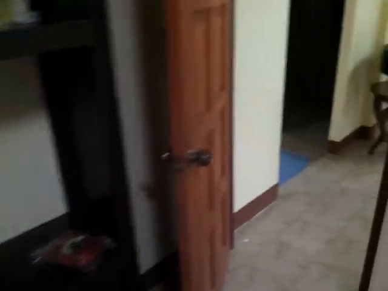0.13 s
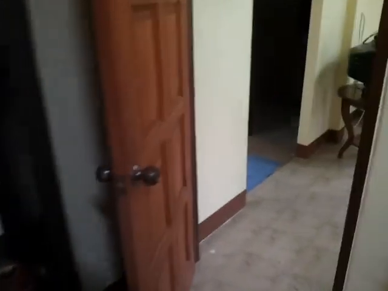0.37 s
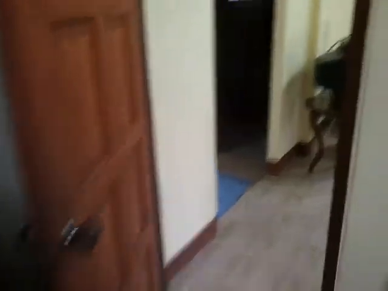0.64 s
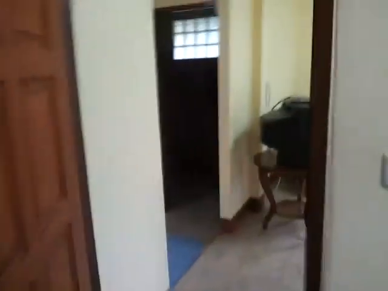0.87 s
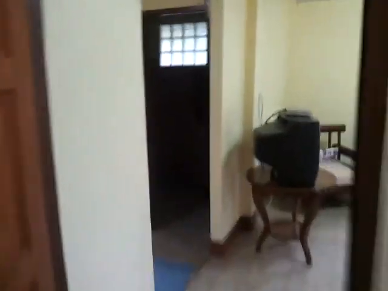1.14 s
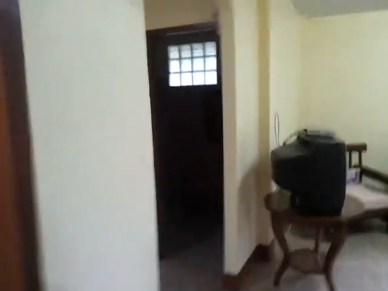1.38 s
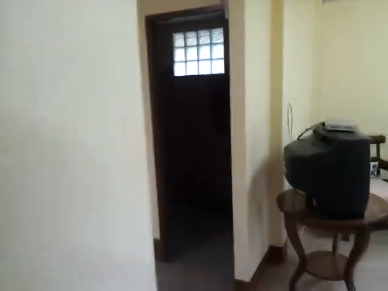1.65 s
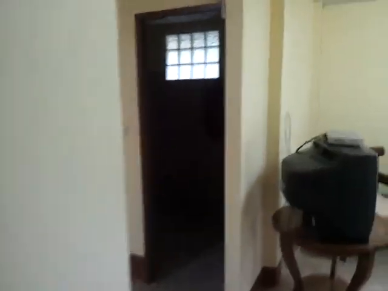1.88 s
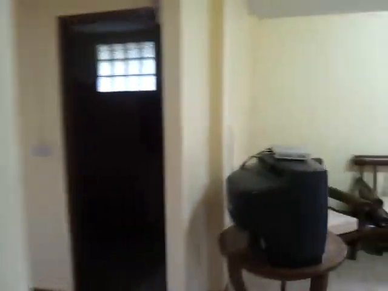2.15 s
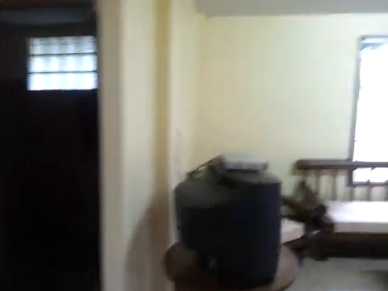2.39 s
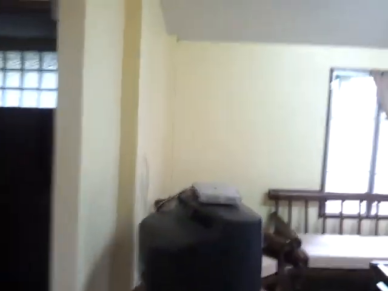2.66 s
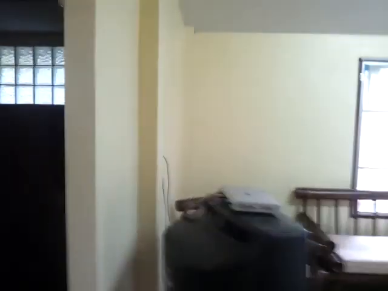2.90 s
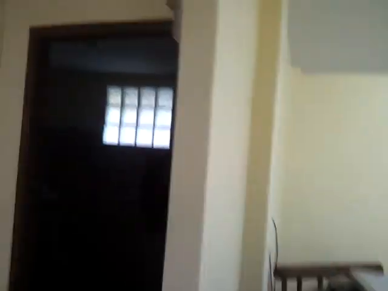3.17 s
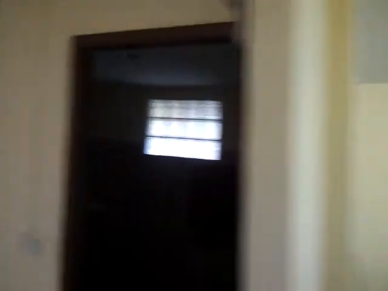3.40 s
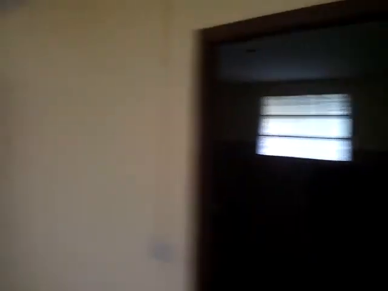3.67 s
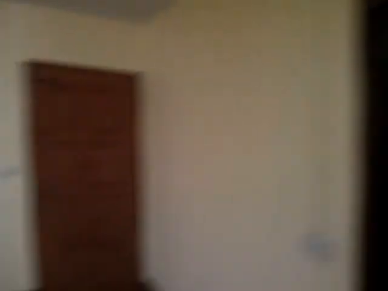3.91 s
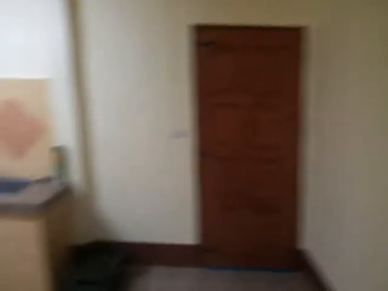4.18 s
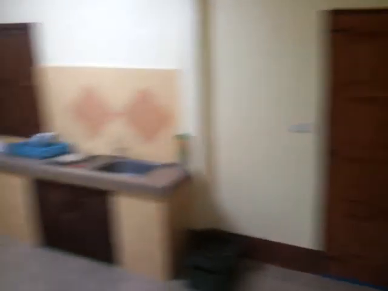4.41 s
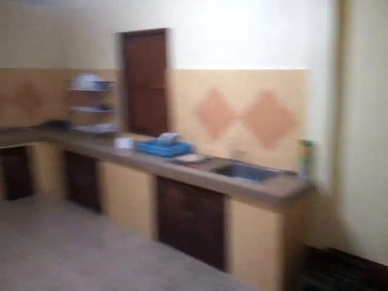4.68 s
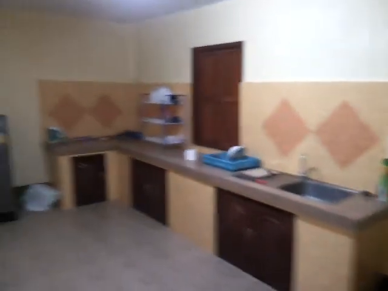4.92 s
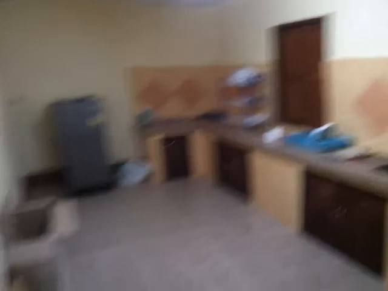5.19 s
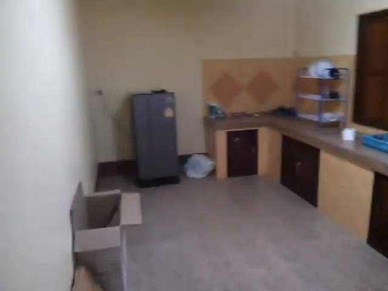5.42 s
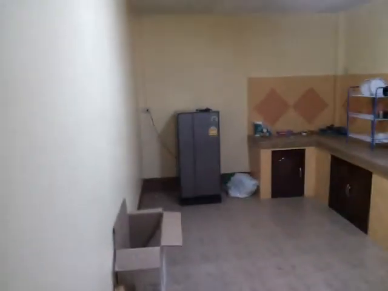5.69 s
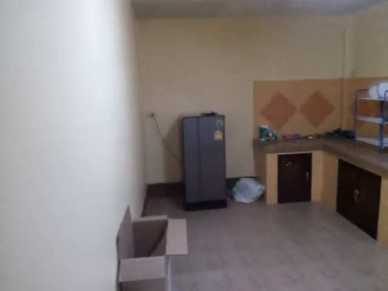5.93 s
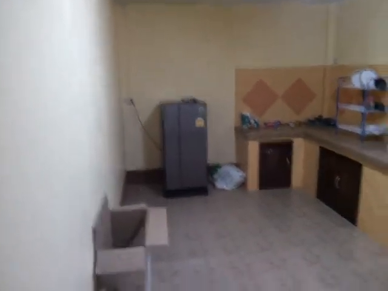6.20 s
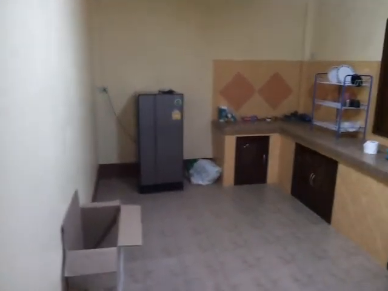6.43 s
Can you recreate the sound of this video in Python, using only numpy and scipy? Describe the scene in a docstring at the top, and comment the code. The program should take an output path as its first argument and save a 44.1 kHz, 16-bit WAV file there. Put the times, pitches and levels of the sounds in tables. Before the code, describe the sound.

Small latch clicks and rustling steps, a faint squeal, one booming door slam ringing through hard empty rooms, then a sharp metallic snap.

```python
"""Knob, hinges and slam in a tiled house

In a bare tiled house a hand works a metal door knob, hinges squeak, a wooden door slams and a far latch snaps later.
Clicks and blows are noise bursts through resonances; metal and wood ring as dying sines; rustle and hiss are noise.
Hard walls ring for about a second. A small hand-held recorder hisses, cuts off above 7 kHz and overloads on the slam."""
import sys
import numpy as np
from scipy import signal
from scipy.io import wavfile
from scipy.ndimage import uniform_filter1d

SR = 44100
rng = np.random.default_rng(int(sys.argv[2]) if len(sys.argv) > 2 else 0)


def master_out(mix):
    """Clip the mix to full scale and print it as 16-bit PCM to the path in sys.argv[1]."""
    frames = np.transpose(np.atleast_2d(mix))
    ceiling = np.clip(frames, -1, 1)
    pcm = np.round(ceiling * 32767).astype(np.int16)
    wavfile.write(sys.argv[1], SR, pcm)


def volts_from_decibels(level):
    """Turn decibel levels (scalar or array-like) into linear amplitude factors."""
    exponent = np.asarray(level, float) / 20
    return 10 ** exponent


N = 289804


def evened(x):
    """Scales x to an rms of 1."""
    return x / np.sqrt(np.mean(x ** 2) + 1e-20)


def read(points, hz):
    """Reads a spectrum curve, interpolated over log frequency."""
    f, value = np.transpose(points)
    return np.interp(np.log(hz + 1), np.log(f + 1), value)


def along(curve):
    """Draws a time curve out over the whole scene."""
    s, value = np.transpose(curve)
    return np.interp(np.arange(N) / SR, s, value)


def add(mix, s, sound):
    """Mixes a sound in at s seconds, cut at the end of the mix."""
    part = mix[round(s * SR):][:len(sound)]
    part += sound[:len(part)]


def colour(x, points):
    """Filters x by a spectrum without echoes ahead of time (minimum phase)."""
    log_gain = np.log(volts_from_decibels(read(points, abs(np.fft.fftfreq(8192, 1 / SR)))))
    taps = np.fft.ifft(np.exp(np.conj(signal.hilbert(log_gain)))).real[:4096]
    return signal.oaconvolve(x, taps)[:len(x)]


def resonate(x, hz, width):
    """A resonance of gain 1: x is shifted down to 0 Hz, smoothed and shifted back up."""
    turn = np.exp(2j * np.pi * hz * np.arange(len(x)) / SR)
    r = np.exp(-np.pi * width / SR)
    return 2 * (turn * signal.lfilter([1 - r], [1, -r], x / turn)).real


def ring(modes, seconds):
    """Dying sines, all set off at once."""
    t = np.arange(round(seconds * SR)) / SR
    return sum(volts_from_decibels(db - 60 * t / t60) * np.sin(2 * np.pi * hz * t) for hz, db, t60 in modes)


def puff(t60, spike):
    """A spike with a short dying burst of noise."""
    t = np.arange(6000) / SR
    burst = rng.standard_normal(6000) * volts_from_decibels(-60 * t / max(t60, .002))
    burst[0] = spike
    return burst


def snap(db, hz, width, t60):
    """A click through two stacked broad resonances, and a smooth impulse of equal energy for the room."""
    sources = puff(t60, spike=5.9), signal.unit_impulse(400)
    sound, impulse = (resonate(resonate(x, hz, width), hz, 1.12 * width) for x in sources)
    sound *= volts_from_decibels(db) / abs(sound).max()
    return sound, impulse * np.linalg.norm(sound) / np.linalg.norm(impulse)


def house(x, fill_s):
    """Sparse reflections of random sign that fill in, then die band by band."""
    # reverberation of the bare rooms: f/Hz, t60/s
    decay = [(60, 0.82), (200, 1.19), (500, 1.07), (1000, 1.076), (2000, 1.038), (3000, 0.99), (5000, 0.94),
             (8000, 0.8)]
    taps = np.zeros(2 * SR)
    at = np.arange(100, 2 * SR - 10, 10)
    taps[at + rng.integers(0, 10, len(at))] = rng.choice([-1., 1.], len(at))
    hz, t, z = signal.stft(taps, SR, nperseg=512)
    dying = z * volts_from_decibels(-60 * t / read(decay, hz)[:, None])
    tail = signal.istft(dying, SR, nperseg=512)[1]
    tail *= 1 - np.exp(-np.arange(len(tail)) / SR / fill_s)
    return signal.fftconvolve(x, tail / np.linalg.norm(tail))[:N]


def blows(rows, spectrum, modes, t60, modes_db, swell_s, fill_s):
    """Each blow cracks and sets off its own set of reflections; the first also rings the modes."""
    out = np.zeros(N)
    impulse = colour(signal.unit_impulse(4096), spectrum)
    for s, db, room_db in rows:
        crack = colour(puff(t60, spike=3.2), spectrum)
        crack *= volts_from_decibels(db) / abs(crack).max()
        add(out, s, crack)
        room_gain = volts_from_decibels(room_db) * np.linalg.norm(crack) / np.linalg.norm(impulse)
        add(out, s, room_gain * house(impulse, fill_s))
    body = ring(modes, 1.5)
    swell = 1 - np.exp(-np.arange(len(body)) / SR / swell_s)
    add(out, rows[0][0], volts_from_decibels(modes_db) * body * swell)
    return out


def background():
    """Coloured noise hisses, narrow noise bands hum and waver, and a low noise band rumbles."""
    # hiss spectrum: f/Hz, level/dB
    floor = [(12, -67), (20, -29), (55, 0), (169, -8.5), (200, -3.5), (304, -10.5), (335, -11.5),
             (603, -12.5), (1200, -18), (1290, -19.5), (2060, -19), (2560, -22.5), (7000, -32), (9100, -59),
             (15400, -120)]
    # slow swell of hiss and hum: t/s, gain/dB
    drift = [(0, -3), (1.5, -1), (2.5, -2), (4.3, 1), (5.2, -2), (6.57, 2)]
    # distant motor, before the swell: f/Hz, width/Hz, level/dB
    motor = [(65.8, 3.3, -65.5), (151, 7.3, -69), (202.6, 2.5, -66.5), (230, 10, -84), (307, 5, -70.5)]
    # far traffic, rising and falling: t/s, level/dB
    traffic = [(0, -65), (1.2, -75), (2.2, -56.5), (4.2, -62), (5.6, -56.5), (6.57, -66)]
    hiss = volts_from_decibels(-55) * evened(colour(rng.standard_normal(N), floor))
    hum = sum(volts_from_decibels(db) * evened(resonate(rng.standard_normal(N), hz, width)) for hz, width, db in motor)
    low_noise = resonate(resonate(rng.standard_normal(N), 90, 150), 73, 200)
    rumble = evened(low_noise) * volts_from_decibels(along(traffic))
    return (hiss + hum) * volts_from_decibels(along(drift)) + rumble


def rustle():
    """Dense small grains; each movement rises, holds and dies away over a faint rest level."""
    # soles and clothes while walking: start t/s, hold/s, level/dB
    movements = [(0.037, 0.29, -56.5), (0.343, 0.044, -55), (.43, 0.38, -65), (0.864, 0.045, -55),
                 (1.375, 0.1, -54.5), (1.684, 0.027, -47), (1.964, .05, -52.5), (2.126, 0.21, -50),
                 (2.48, .06, -53.5), (2.576, 0.17, -51.5), (2.804, .16, -58), (5.39, .14, -57)]
    # grain spectrum: f/Hz, level/dB
    tint = [(300, -20), (1500, -9.5), (3000, -5.5), (4200, 5), (5500, 4), (7000, 0), (10000, 4.5)]
    rise_s, fall_db_per_s, rest_db = 0.01, 68.5, -61.5
    # noise of uneven strength, each sample lifted by 0 to 16 dB
    grains = rng.standard_normal(N) * volts_from_decibels(4.0 * np.minimum(rng.exponential(1, N), 4))
    t = np.arange(N) / SR
    power = volts_from_decibels(rest_db) ** 2
    for start, hold, db in movements:
        fall_db = fall_db_per_s * np.maximum(t - start - rise_s - hold, 0)
        rise = np.clip((t - start) / rise_s, 0, 1)
        power = power + (rise * volts_from_decibels(db - fall_db)) ** 2
    return evened(colour(grains, tint)) * np.sqrt(power)


def clicks():
    """Latch and knob clicks through broad resonances, each with its share of the room."""
    # clicks: t/s, direct peak level/dB, f/Hz, burst t60/s, room re direct/dB
    hits = [(0.0914, -44, 1880, .04, 5.5), (0.715, -29, 3600, 0.0092, -19),
            (0.7593, -43, 5500, 0.0081, -24.5), (0.8655, -47, 5160, 0.023, 10.5),
            (0.8785, -39, 4940, 0.014, -7), (.912, -38, 2940, 0.023, -1), (1.488, -38, 5240, 0.068, 0.5),
            (1.577, -34.5, 5000, .02, -3), (1.6115, -22.5, 4650, 0.036, -8),
            (1.614, -31, 1430, 0.041, -4.5), (1.6358, -30, 4000, 0.05, -13), (1.709, -28, 4340, .015, -10),
            (1.726, -30, 4100, 0.055, -14), (1.744, -36, 3000, 0.059, -16), (1.992, -38, 5550, 0.063, -7),
            (1.868, -40, 5500, 0.013, -11), (2.019, -35.5, 6590, 0.018, -19),
            (2.1503, -22, 5400, 0.02, 0.5), (2.161, -28, 4920, 0.023, -11), (2.184, -24, 5400, 0.021, -18),
            (2.189, -27, 5500, 0.056, -5), (2.573, -30.5, 6400, 0.022, 0.5), (2.797, -36, 6690, .015, -10),
            (2.8963, -33, 6000, .01, 0), (3.3080, -2.5, 5260, 0.013, -7), (3.909, -31.5, 4930, 0.027, 6),
            (4.5884, -38, 3240, 0.0096, 5), (5.397, -35.5, 5400, 0.0093, 0.5)]
    near, far = np.zeros((2, N))
    for s, db, hz, t60, room_db in hits:
        width = 4300 / (1 + (1500 / hz) ** 2)  # Hz; low clicks ring narrower
        sound, impulse = snap(db, hz, width, t60)
        add(near, s, sound)
        add(far, s, volts_from_decibels(room_db) * impulse)
    return near + house(far, fill_s=0.0025)


def knob():
    """The knob's thin shell pings high and its spindle rings low, as dying sines set off by each blow."""
    # blows on the knob: t/s, shell level/dB, spindle level/dB
    strikes = [(0.1224, -49, -77.5), (1.578, -53, -76), (1.699, -37, -63), (1.7028, -23.5, -52),
               (1.7095, -28, -52), (1.7235, -29, -70), (1.728, -61, -30.5), (1.7443, -42, -32),
               (1.77, -51, -50), (1.946, -46.5, -87), (2.44, -50.5, -85), (2.475, -51.5, -85),
               (2.557, -53, -85), (2.576, -41, -76), (5.396, -63.5, -52)]
    # shell modes: f/Hz, level/dB, t60/s
    shell_modes = [(6735, 0, .085), (6756, -14, .2), (6700, -14, .2), (6560, -16, .08), (6918, -18, .2)]
    # spindle modes: f/Hz, level/dB, t60/s
    spindle_modes = [(1104, 0, .06), (1075, -15, .14), (1150, -15, .14), (1400, -14, .05), (2150, -10, .05)]
    rise = 1 - np.exp(-np.arange(round(.4 * SR)) / SR / 0.00051)
    shell = rise * ring(shell_modes, .4)
    spindle = rise * ring(spindle_modes, .4)
    out = np.zeros(N)
    for s, shell_db, spindle_db in strikes:
        add(out, s, volts_from_decibels(shell_db) * shell + volts_from_decibels(spindle_db) * spindle)
    return out + volts_from_decibels(-15) * house(out, fill_s=0.0054)


def handling():
    """Dry, quickening ticks creep over the case, one louder tick lets go, and slow pushes move the membrane."""
    # low pressure steps at the microphone: t/s, level/dB
    pushes = [(.412, -34), (.456, -39.5), (.5, -41)]
    creep_start_s, creep_ticks, first_gap_s, gap_shrink = .365, 8, .0088, .87
    creep_db, spread_db, first_hz, dull_hz_per_s = -32, 2, 4700, 24000
    out = np.zeros(N)
    since = 0  # s from the first tick
    for k, (size, slip) in enumerate(rng.uniform(-1, 1, (creep_ticks, 2))):
        hz = first_hz - dull_hz_per_s * since
        tick = snap(creep_db + spread_db * size, hz, width=2300, t60=0.0072)[0]
        add(out, creep_start_s + since, tick)
        since += first_gap_s * gap_shrink ** k * (1 + .25 * slip)
    let_go = snap(-10.5, 7800, width=4100, t60=0.0057)[0]
    add(out, .412, let_go)
    t = np.arange(SR // 4) / SR
    push = np.exp(-t / 0.024) * (1 - np.exp(-t / 0.00092))
    for k, (s, db) in enumerate(pushes):
        sign = 1 if k == 0 else -1
        add(out, s, sign * volts_from_decibels(db) * push)
    return out


def hinges():
    """Uneven slips keep narrow modes of the hinge whistling: pitch trembles, grip stutters."""
    # squeaks: start t/s, end t/s, f/Hz, start level/dB
    squeaks = [(2.44, 2.56, 4151, -56), (2.8, 2.9, 6720, -59), (2.896, 2.98, 3924, -48),
               (2.98, 3.16, 3924, -59), (2.9, 3.16, 6751, -52), (3.16, 3.3, 6850, -60),
               (2.95, 3.16, 5103, -66), (3.16, 3.285, 3935, -54.5), (3.157, 3.305, 5093, -51.5),
               (3.157, 3.305, 6460, -50.5)]
    fade_db_per_s, tremble_hz, stutter_db = 17, 14, 5.5
    out = np.zeros(N)
    for start, end, hz, db in squeaks:
        n = round((end - start) * SR)
        slow_noise = (uniform_filter1d(v, 350) for v in rng.standard_normal((2, SR)))
        tremble, grip = (evened(v)[:n] for v in slow_noise)
        phase = 2 * np.pi * np.cumsum(hz + tremble_hz * tremble) / SR
        tone = np.sin(phase) * volts_from_decibels(stutter_db * grip)
        fade = volts_from_decibels(db - fade_db_per_s * np.arange(n) / SR)
        add(out, start, evened(tone) * fade * signal.windows.tukey(n, .05))
    return out + volts_from_decibels(-9) * house(out, fill_s=.006)


def slam():
    """The door hits its frame: noisy cracks, with the panel and the air between the walls booming as modes."""
    # latch meets plate, door meets frame and rebounds: t/s, crack peak level/dB, room re crack/dB
    impacts = [(3.3078, -6, 5), (3.312, -3.5, 12.5), (3.345, 2.5, 1.5), (3.385, 5, -9.5)]
    # crack spectrum: f/Hz, level/dB
    tint = [(30, -50), (80, -23), (200, -0.5), (300, -12.5), (380, -3), (450, -9), (520, -4), (740, -7.5),
            (920, -1.5), (1400, -2), (2050, -4), (2600, -6.5), (4000, -5.5), (7000, -10)]
    # door panel and air between the walls: f/Hz, level/dB before modes_db, t60/s
    boom = [(102.7, -9.5, 0.67), (135, -9.5, 1.1), (188, -1.5, 0.59), (233.5, 1, 0.57), (259.3, -7.5, 0.96),
            (361.6, -5.5, 1.05), (389, -4, 0.61), (516.5, -10.5, 1.12), (665, -15, 1), (911, -1.5, 0.84),
            (1320, -2.5, 0.85), (1526, 6.5, 0.14), (1658, 0, .3)]
    return blows(impacts, tint, boom, t60=0.13, modes_db=-15, swell_s=0.0047, fill_s=0.002)


def latch():
    """The far latch snaps shut and rattles: sharp, bright cracks over ringing metal modes."""
    # snap and rattle: t/s, crack peak level/dB, room re crack/dB
    impacts = [(5.5405, -34, -10), (5.5422, -4, 0), (5.5472, -7.5, 4.5), (5.5525, -14.5, 2),
               (5.5725, -12.5, 3.5)]
    # crack spectrum: f/Hz, level/dB
    tint = [(120, -34), (370, -21.5), (580, -9.5), (800, -15), (1210, -3.5), (1600, -12), (2160, -2.5),
            (2800, -8.5), (3350, -3), (3750, -6), (4280, 0), (5500, 0.5), (7000, -5)]
    # latch modes: f/Hz, level/dB before modes_db, t60/s
    modes = [(608, -7, 0.28), (1216, 2.5, 0.34), (1980, -21, 0.43), (2190, -14, 1), (3290, -9, 0.99),
             (3390, -14, 0.64), (4290, 6, .2)]
    return blows(impacts, tint, modes, t60=0.017, modes_db=-37.0, swell_s=0.0014, fill_s=0.0076)


def scene():
    """Sums all layers into one channel."""
    mix = background() + rustle() + clicks() + knob() + handling() + hinges() + slam() + latch()
    return mix[None]


def roll_off(x):
    """The treble ends steeply here."""
    return signal.sosfilt(signal.butter(12, 16410, fs=SR, output="sos"), x)


def record(dry):
    """Gain control ducks loud sound, the preamp saturates, the band ends near 7 kHz, the tallest peaks are cut flat."""
    # microphone response: f/Hz, gain/dB
    response = [(20, -3), (6900, 3.5), (7600, -5.5), (8300, -19), (9200, -32), (10000, -74.5), (22000, -88)]
    # power over the latest 800 samples
    power_db = 10 * np.log10(abs(uniform_filter1d(dry[0] ** 2, 800, origin=399)) + 1e-12)
    fall = np.arange(N) * 18.6 / SR  # recovery of 18.6 dB a second
    held_db = np.maximum.accumulate(power_db + fall) - fall
    over_db = np.maximum(held_db + 26.0, 0)  # above a threshold of -26 dB
    smooth_db = signal.lfilter([1 / 1400], [1, 1 / 1400 - 1], over_db)
    ducked = dry[0] * volts_from_decibels(-.2 * smooth_db)
    soft = .56 * np.tanh(1.12 * ducked / .56)
    cut = np.clip(colour(soft, response), -.72, .72)
    return roll_off(cut[None])


dry = scene()
out = record(dry)
master_out(out)
```